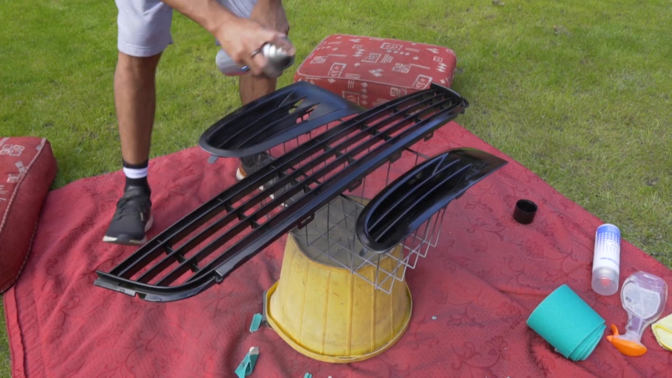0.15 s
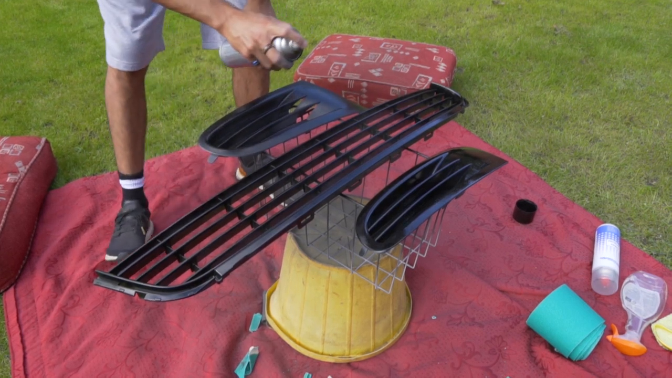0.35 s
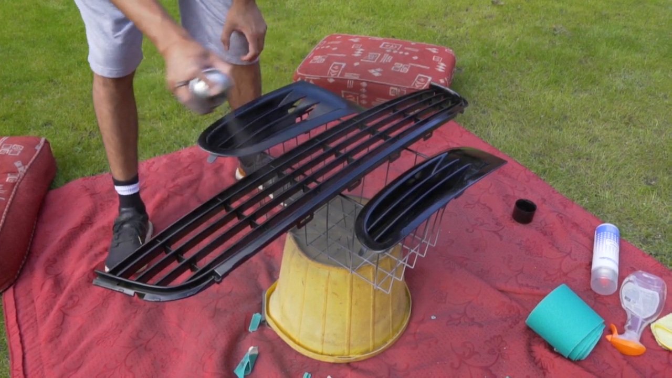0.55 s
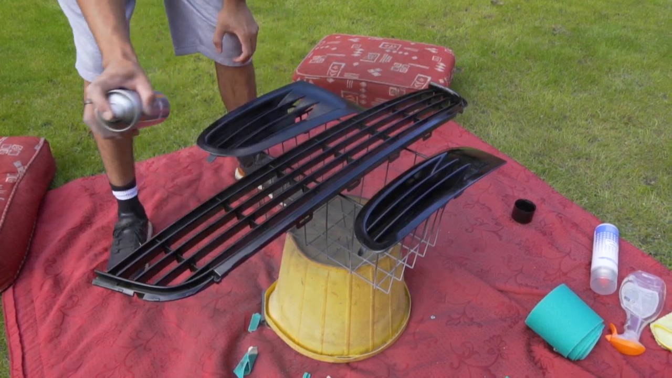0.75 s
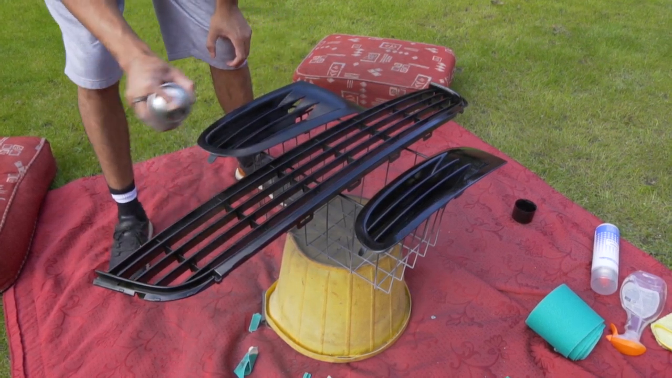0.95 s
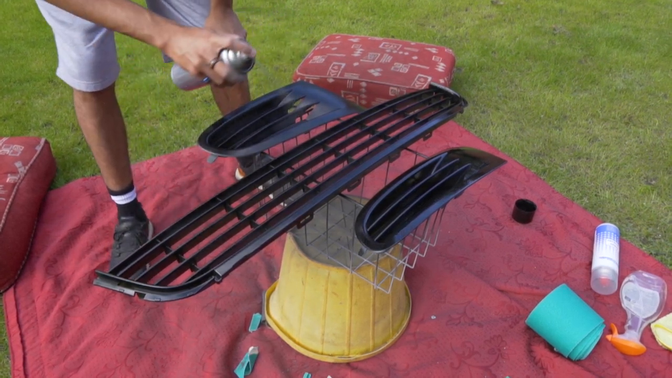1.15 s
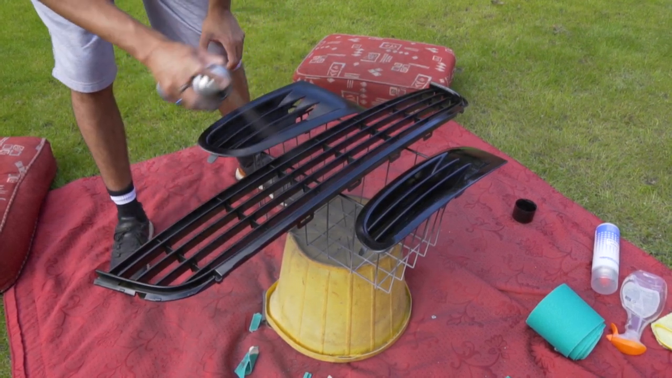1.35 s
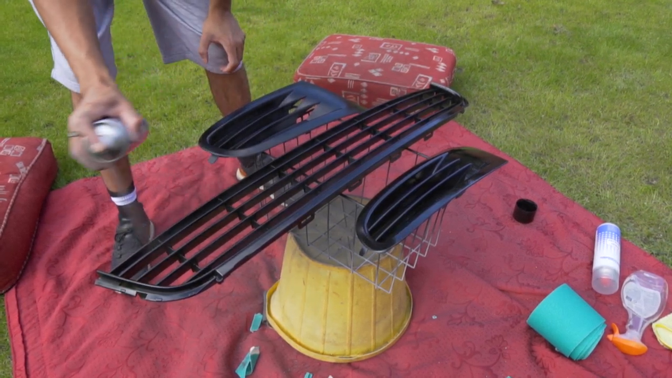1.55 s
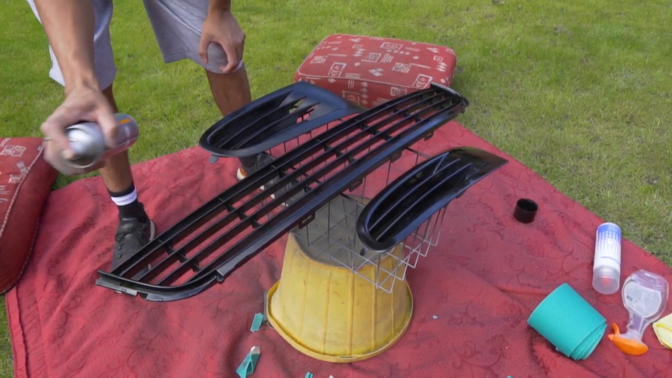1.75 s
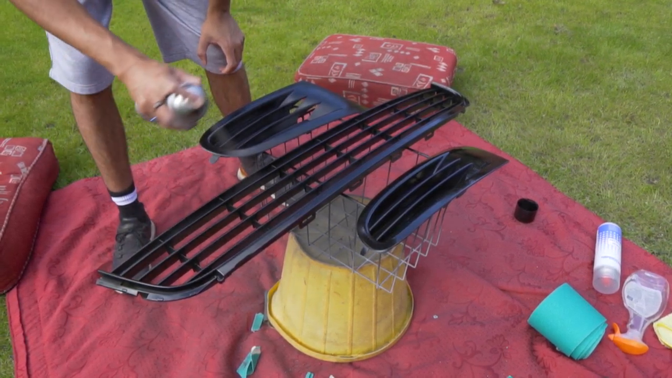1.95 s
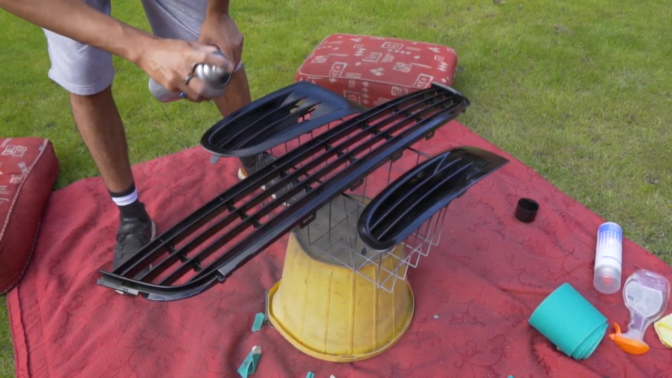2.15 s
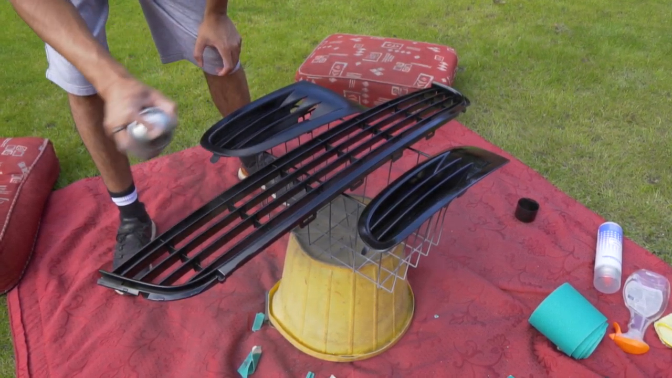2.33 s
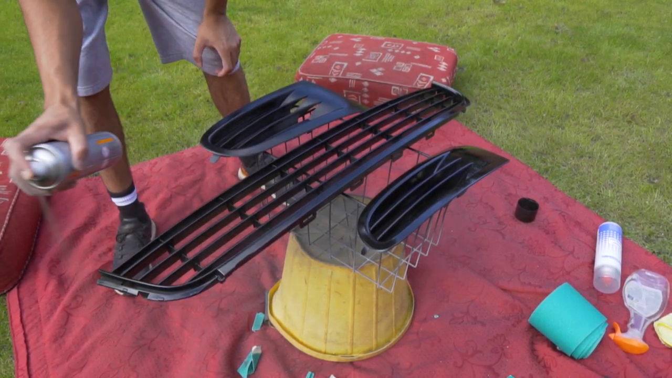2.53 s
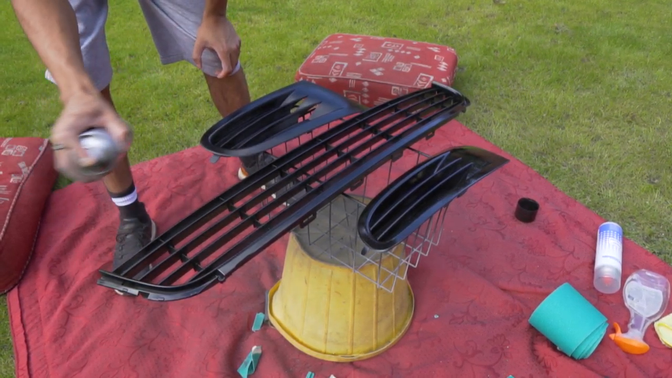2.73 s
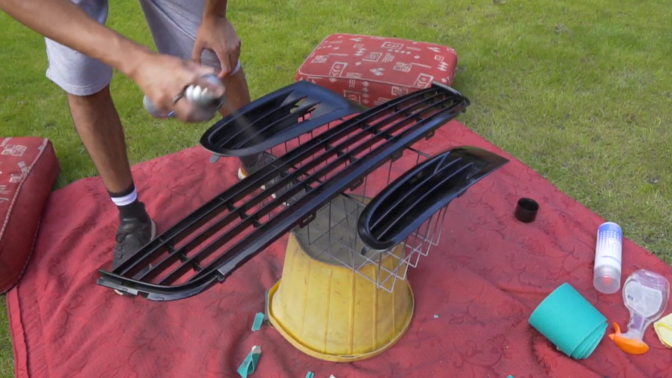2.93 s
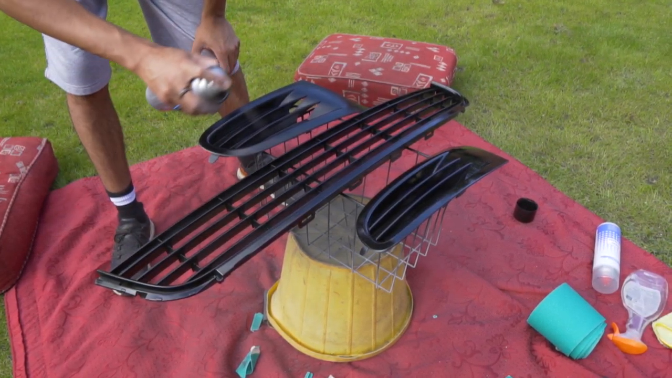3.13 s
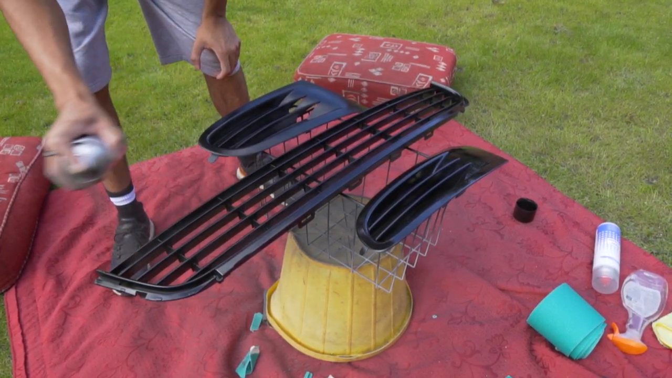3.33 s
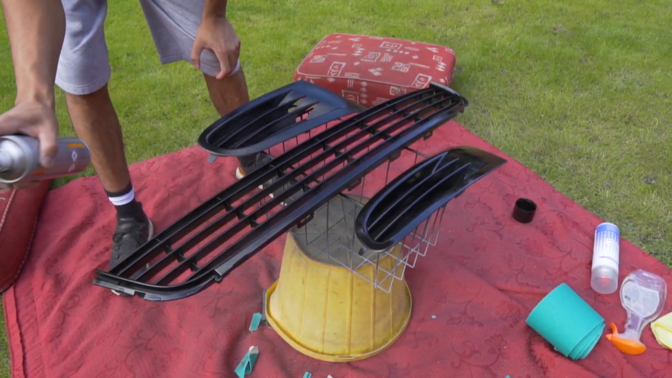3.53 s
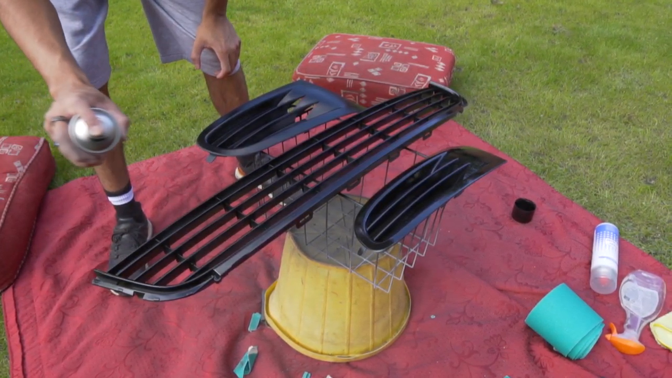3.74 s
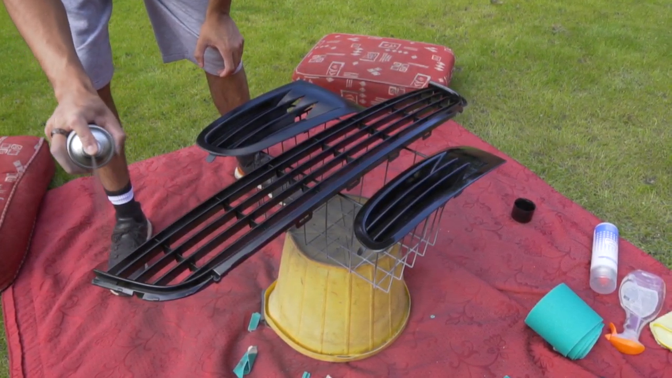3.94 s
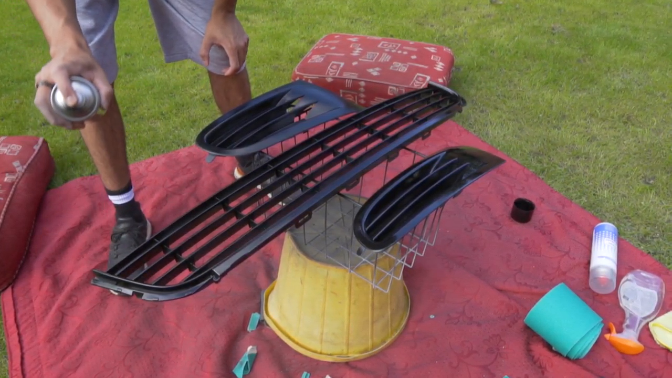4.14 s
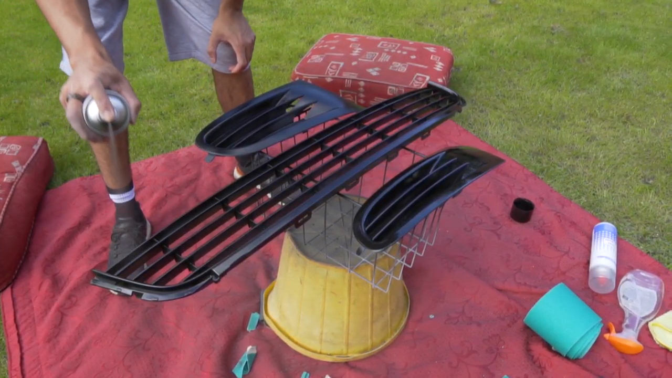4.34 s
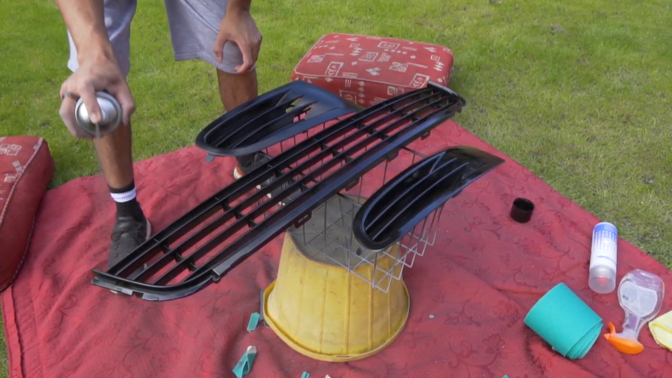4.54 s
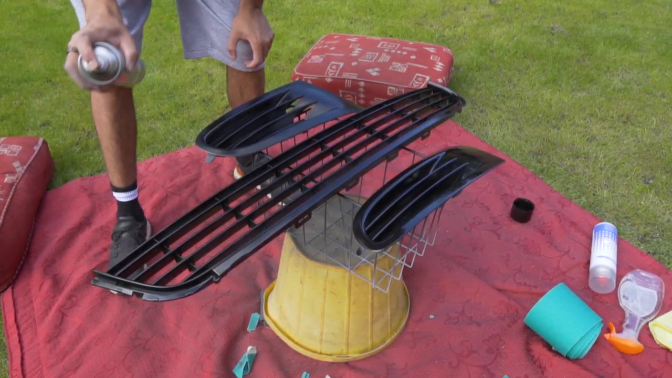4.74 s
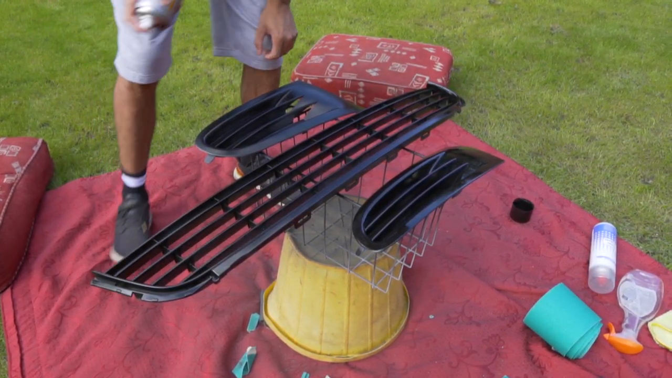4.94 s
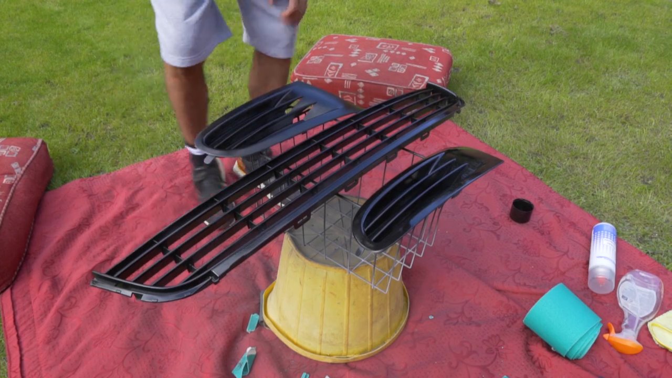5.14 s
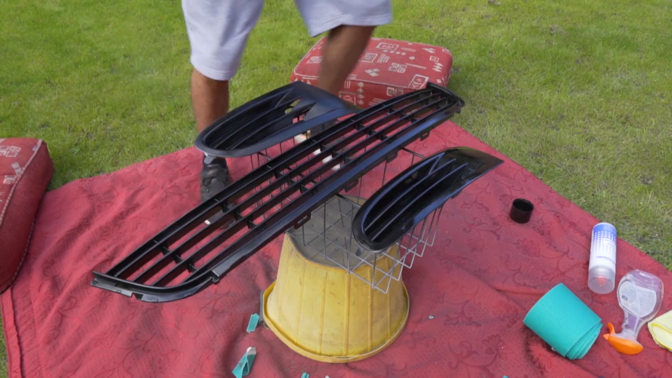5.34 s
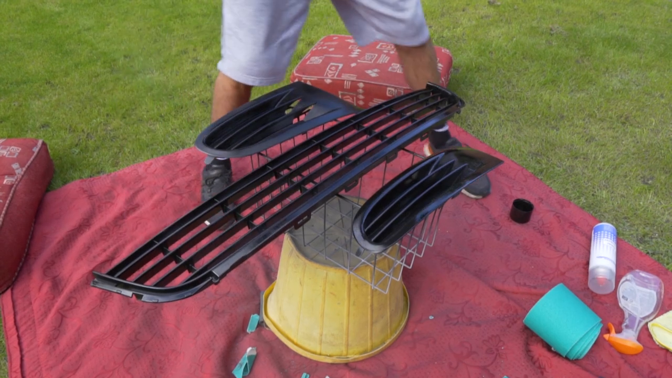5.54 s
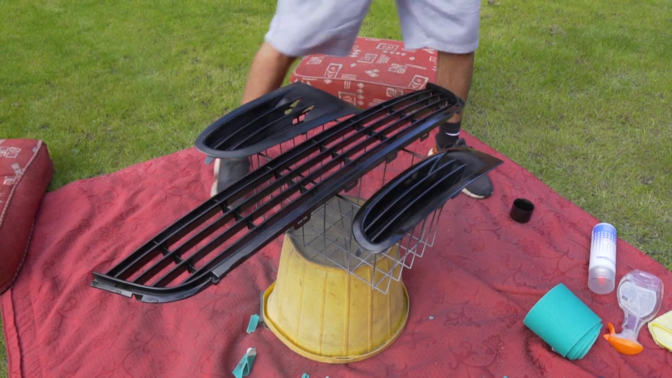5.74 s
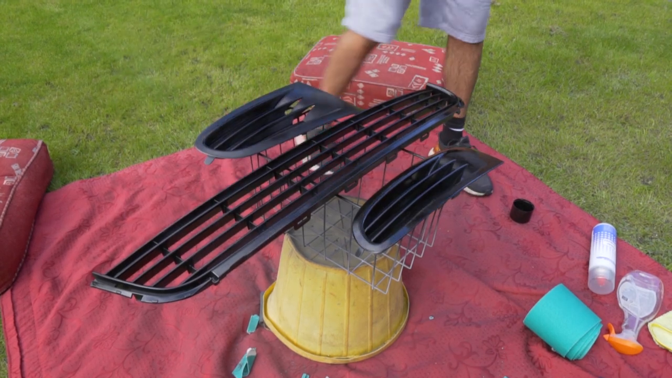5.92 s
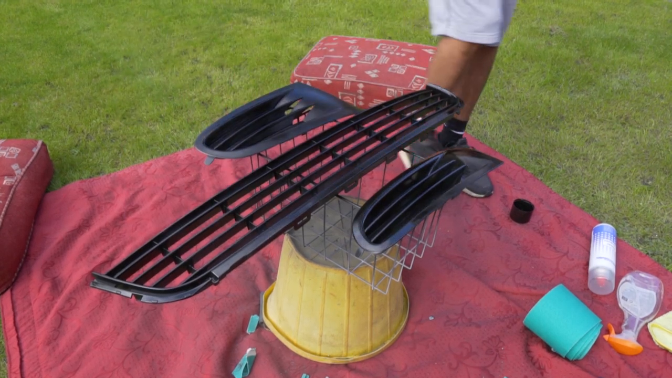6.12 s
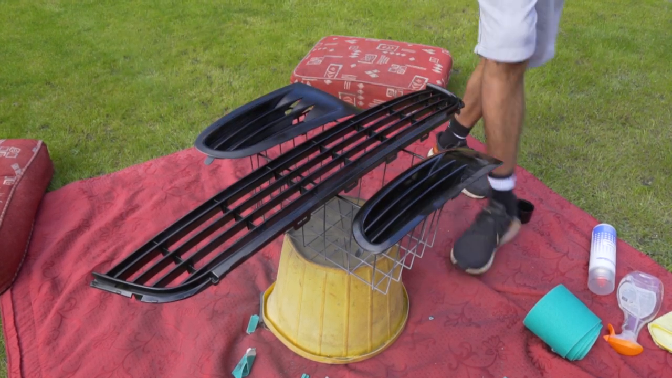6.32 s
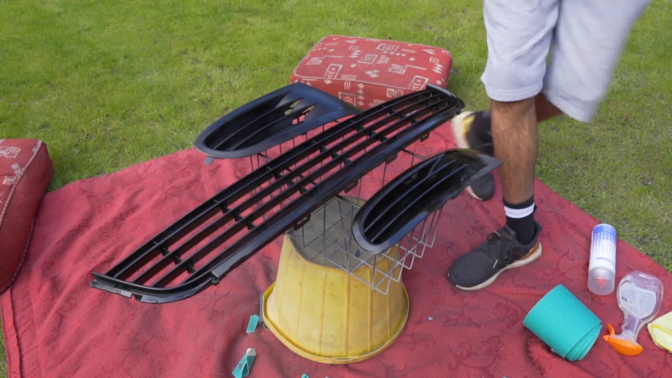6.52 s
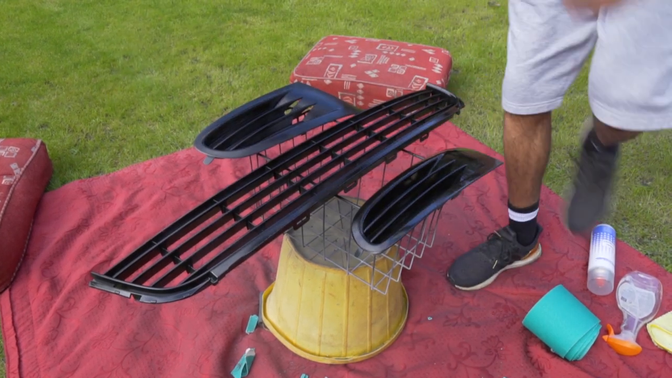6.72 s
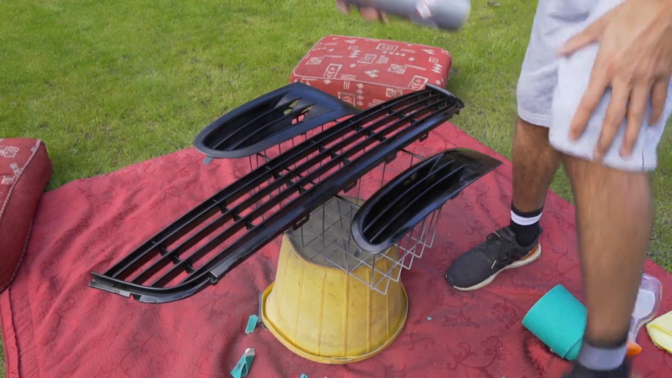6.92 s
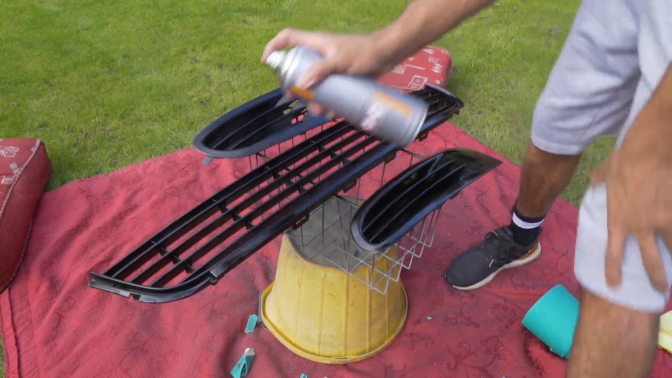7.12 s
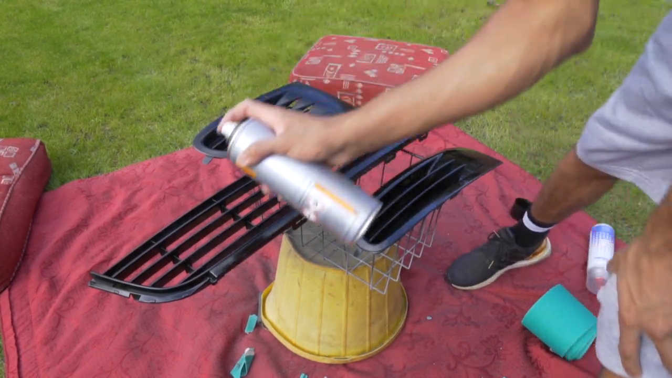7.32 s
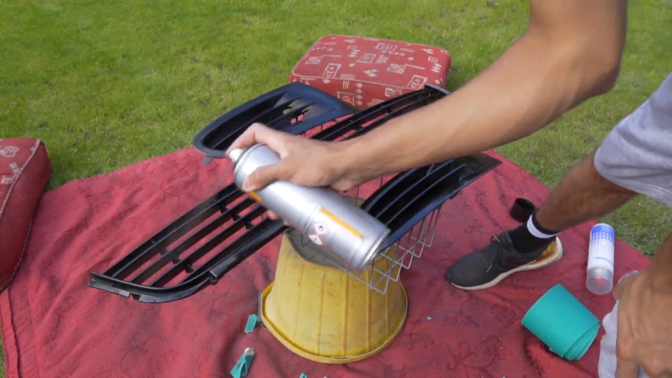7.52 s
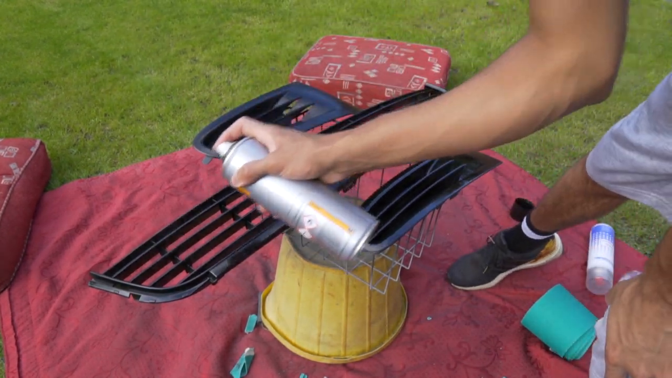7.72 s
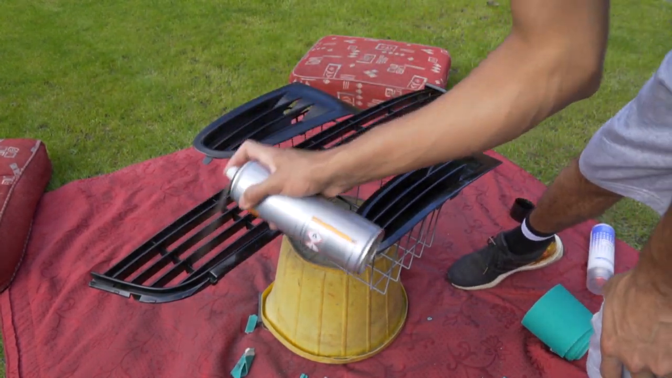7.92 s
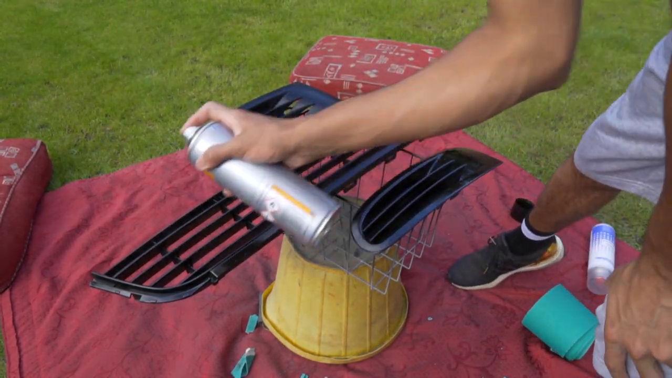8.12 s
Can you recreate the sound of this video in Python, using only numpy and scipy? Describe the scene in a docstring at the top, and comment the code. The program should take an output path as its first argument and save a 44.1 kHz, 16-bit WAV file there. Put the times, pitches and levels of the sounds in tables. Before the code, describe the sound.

Outdoors, with distant traffic humming softly, a close microphone picks up an aerosol can spraying in short rhythmic hisses, about two a second. After ten of them the can is shaken, its ball knocking with dry, irregular metallic clicks while the painter's clothing rustles softly. Near the end the hiss returns for two short bursts, with a few weaker clicks from the can.

```python
"""Far traffic and a low engine drone lie under a lawn, heard at one close microphone. From the start a
spray can paints plastic parts in ten short squirts, its turbulent jet swept to and fro so that the
reflections off the parts shift. Near 4 s a puff of wind rumbles. From about 5 s the painter steps round
in rustling clothes while the mixing ball strikes the can's base and wall into ringing.
At 7.4 s two more squirts begin, over the last few knocks."""
import sys
import numpy as np
from scipy import signal
from scipy.fft import rfft, irfft
from scipy.io import wavfile
from scipy.ndimage import uniform_filter1d, map_coordinates

SR = 44100
rng = np.random.default_rng(int(sys.argv[2]) if len(sys.argv) > 2 else 0)


def waveform_to_disk(signal):
    """Save audio, clipped to [-1, 1], as 16-bit WAV at the path in sys.argv[1]."""
    frames = np.transpose(np.atleast_2d(signal))
    scaled = np.clip(frames, -1, 1) * 32767
    samples = np.round(scaled).astype(np.int16)
    wavfile.write(sys.argv[1], SR, samples)


N = 360293
TIME = np.arange(N) / SR


def from_db(db):
    """Amplitude grows tenfold for every 20 dB."""
    return 10 ** (np.asarray(db) / 20)


def unit_rms(x):
    """Normalisation to a mean power of 1."""
    return x / np.sqrt(np.mean(x ** 2) + 1e-20)


def noise(spectrum):
    """Spectral shaping colours white noise by (Hz, dB) points; rms 1."""
    hz, db = np.transpose(spectrum)
    log_hz = np.log(np.fft.rfftfreq(N, 1 / SR) + 1)
    gain = from_db(np.interp(log_hz, np.log(hz), db, left=-np.inf))
    return unit_rms(irfft(rfft(rng.standard_normal(N)) * gain, N))


def drift(rate_hz):
    """Low-pass filtering turns noise into a slow random fluctuation; rms 1."""
    r = np.exp(-2 * np.pi * rate_hz / SR)
    return unit_rms(signal.lfilter([1], [1, -2 * r, r * r], rng.standard_normal(N + SR))[SR:])


def resonant_noise(centre_hz, width_hz, block=256):
    """A moving resonance, applied twice, selects one band of noise; rms 1."""
    out, state = rng.standard_normal(N), np.zeros((2, 2))
    r = np.exp(-np.pi * width_hz / SR)
    for i in range(0, N, block):
        section = [1, 0, -1, 1, -2 * r * np.cos(2 * np.pi * centre_hz[i] / SR), r * r]
        out[i:i + block], state = signal.sosfilt([section, section], out[i:i + block], zi=state)
    return unit_rms(out)


def swells(rows):
    """Gaussian envelopes add up to one gain curve."""
    return sum(from_db(db) * np.exp(-((TIME - s) / half_s) ** 2) for s, half_s, db in rows)


# Tyre roar. Each row: frequency in Hz, relative spectral density in dB.
TRAFFIC_SPECTRUM = [(18, 5.5), (32, 6), (48, 5), (100, -2), (190, -3), (255, -2.5), (350, -8), (660, -6.5),
                    (890, -1.5), (1130, -5), (1450, -12), (2100, -20.5), (3400, -31.5), (8000, -44.5),
                    (16000, -54)]
# Each row: loudest moment in seconds, half length in seconds, level in dB.
ENGINE_SWELLS = [(1.48, .12, -39.5), (2.14, .08, -40.5), (2.4, .14, -38.7), (3.2, .15, -50),
                 (4.1, 0.47, -52), (5.0, 0.28, -52), (7.2, 0.24, -51)]
# Each row: time in seconds, pitch in Hz.
ENGINE_PITCH = [(0, 77), (1.3, 80.4), (2.4, 80), (3.3, 81), (4.6, 71), (5.6, 65), (8.17, 64)]

def street():
    """Far tyres give broadband noise; an engine gives a tone whose pitch falls as it slows."""
    hz = np.interp(TIME, *np.transpose(ENGINE_PITCH))
    phase = 2 * np.pi * np.cumsum(hz * (1 + 0.0058 * drift(3.7))) / SR
    engine_rms = (from_db(-55) + swells(ENGINE_SWELLS)) * from_db(1.7 * drift(8.6))
    tyres = from_db(-38 + 0.12 * drift(1.6)) * noise(TRAFFIC_SPECTRUM)
    return np.sqrt(2) * engine_rms * np.sin(phase) + tyres


def breeze():
    """Pressure fluctuations in a puff of wind rumble on the microphone."""
    return swells([(3.95, .5, -44)]) * noise([(20, 1), (45, 0), (90, -11), (200, -26), (1000, -73)])


def garden_echoes(x, early_db, early_t60, late_db, late_t60):
    """Scattering off near things and a faint tail from fences and walls return a duller sound."""
    t = np.arange(SR // 2) / SR
    near, far = rng.standard_normal((2, len(t))) * (t > .003)
    near = near * rng.exponential(1, len(t)) * from_db(-60 * t / early_t60)
    far = far * from_db(-60 * t / late_t60)
    response = from_db(early_db) * near / np.linalg.norm(near)
    response += from_db(late_db) * far / np.linalg.norm(far)
    response = signal.sosfilt(signal.butter(2, 9500, fs=SR, output="sos"), response)
    return signal.fftconvolve(x, response)[:N]


# Each row: frequency in Hz, relative spectral density in dB.
CLOTH_SPECTRUM = [(900, -12), (1800, 0), (3000, -1.2), (4800, 0), (6500, -7), (9000, -9), (10500, -18),
                  (13000, -16), (16000, -20)]
# Rubbing at each step. Each row: middle in seconds, half length in seconds, level in dB.
STEP_RUBS = [(4.95, 0.069, -56.5), (5.12, 0.14, -53.5), (5.26, 0.086, -53.5), (5.51, .03, -53),
             (5.75, 0.21, -58), (6.08, 0.061, -52.5), (6.66, 0.084, -54.5), (7.05, .2, -57),
             (7.39, .06, -61.5)]

def clothes():
    """Friction of cloth and soles makes uneven noise; one rub has a narrow, zipping note."""
    zipping = swells([(5.26, 0.031, -51)]) * resonant_noise(np.full(N, 4800), width_hz=700)
    return swells(STEP_RUBS) * from_db(2.3 * drift(40)) * noise(CLOTH_SPECTRUM) + zipping


def struck(modes, t, scatter, spread_db, crack):
    """An impact excites damped modes and a noisy crack, with the energy of 10 ms at rms 1."""
    hz, db, t60 = np.transpose(modes)[:, :, None]
    # where the ball lands shifts and weights each mode, here by chance
    detune, weight, side = rng.standard_normal((3, len(modes), 1))
    envelopes = np.sign(side) * from_db(db + spread_db * weight - 60 * t / t60)
    rings = envelopes * np.sin(2 * np.pi * hz * (1 + scatter * detune) * t)
    # the crack spans the modes and falls away on either side
    octaves = np.log2(np.fft.rfftfreq(len(t), 1 / SR) + 1)
    order = np.argsort(hz[:, 0])
    centres = np.log2(hz[order, 0])
    octaves_outside = np.abs(octaves - np.clip(octaves, centres[0], centres[-1]))
    colour = from_db(np.interp(octaves, centres, db[order, 0]) - 9.2 * octaves_outside)
    burst = irfft(rfft(rng.standard_normal(len(t))) * colour, len(t))
    burst *= from_db(-60 * t / (0.49 * t60.mean()))
    attack = 1 - np.exp(-t / 0.00013)
    blow = (unit_rms(rings.sum(axis=0)) + crack * unit_rms(burst)) * attack
    return blow / np.sqrt(np.sum(blow ** 2) / (.01 * SR))


# Steel wall modes. Each row: frequency in Hz, relative level in dB, 60 dB decay time in seconds.
WALL_LOW_MODES = [(940, -9, 0.0092), (2384, -1, 0.02), (2740, 0.5, 0.015), (3160, 0.5, 0.014),
                  (3360, -4.5, 0.021), (3810, 1.5, 0.016), (4180, -3, 0.021), (4460, -2.5, 0.012)]
WALL_HIGH_MODES = [(5240, -0.5, 0.014), (5950, -2, 0.012), (6360, 0, 0.019), (7060, 0, 0.014),
                   (7590, -5, 0.014), (8360, -2.5, 0.013), (8890, -3.5, 0.015), (10900, -15, 0.0052),
                   (11140, -17.5, .009), (12150, -20, 0.0076), (14500, -16, 0.0048)]

def wall_hit(clank_db, tick_db, t):
    """Damping cuts the thin wall's modes short: a dry clank and a brighter tick."""
    blow = dict(scatter=.07, spread_db=2.4, crack=1.2)
    clank = from_db(clank_db + 0.63) * struck(WALL_LOW_MODES, t, **blow)
    tick = from_db(tick_db - 1.7) * struck(WALL_HIGH_MODES, t, **blow)
    return clank + tick


# Each row: time in seconds, pitch of the base in Hz, relative level in dB,
# place from 0 (base) to 1 (rim), gap to the first bounce in seconds (0 for none).
BALL_KNOCKS = [(2.676, 1700, -39.5, .55, 0), (2.697, 1720, -49, 0.67, 0.019),
               (5.1123, 1700, -30, 0.14, 0.028), (5.38, 1940, -28, 0.62, 0.00021),
               (5.4282, 1660, -38.5, 0.26, 0.00099), (5.4512, 1670, -36.5, 0.24, 0.017),
               (5.482, 1710, -39, 0.2, 0.013), (5.582, 1545, -14.5, 0.7, 0), (5.607, 2000, -25, .45, 0),
               (5.611, 1720, -21, 0, 0), (5.6369, 1700, -27.5, 0.33, 0.022),
               (5.7966, 2125, -18, 0.68, 0.0032), (5.853, 1310, -30, 0.51, 0),
               (5.88, 1770, -34, 0.15, .023), (5.9443, 1800, -16.5, 0.94, 0),
               (5.9454, 1750, -11.5, .75, 0.00013), (5.974, 1840, -30.5, 0.79, 0.0036),
               (6.0523, 1671, -31, .24, 0.00061), (6.0849, 1700, -30.5, 0.11, 0.017),
               (6.1672, 1390, -23, 0.53, 0.0022), (6.2577, 1760, -28, 0.14, .0485),
               (6.373, 1739, -12, 1, 0.0011), (6.4334, 1880, -24, 0.17, 0), (6.517, 1610, -30, 0.25, 0.045),
               (6.7545, 1830, -18, 0.59, 0), (6.8155, 1464, -20.5, 0.12, 0.00012),
               (6.904, 1329, -11, 0.83, 0), (6.9272, 1690, -15, .68, 0.00038),
               (7.0247, 1590, -17.5, 0.11, 0), (7.0987, 1629, -19.5, 0.59, 0.00071),
               (7.104, 1630, -21, .12, 0), (7.1828, 1650, -20.5, 0.04, 0), (7.2374, 1610, -21, 0, 0),
               (7.2697, 1647, -31.5, 0.075, 0.016), (7.5596, 2070, -24, 0.48, 0),
               (7.641, 1600, -34.5, .45, .016), (7.7066, 1460, -33.5, 0.53, 0.02),
               (7.7756, 1490, -38, 0.43, .021), (8.0609, 1430, -26.5, 0.44, 0),
               (8.1275, 1513, -30, 0.31, 0)]

def contacts(bounces=4, restitution=.72, loss_db=5.5):
    """Inelastic collision: after a knock, each bounce comes sooner and weaker than the last."""
    for s, hz, db, place, gap_s in BALL_KNOCKS:
        yield s, hz, db, place
        for bounce in range(bounces if gap_s > 0 else 0):
            s += gap_s * restitution ** bounce
            yield s, hz, db - loss_db * (bounce + 1), place


# Each row: place from 0 (base) to 1 (rim), then gains of base ring, wall clank and tick in dB.
GAINS_BY_PLACE = [(0, -0.5, -12.5, -18), (.2, -.5, -6, -6.5), (.45, -6.5, 0.5, -7), (.75, -14.5, -8.5, 1),
                  (1, -42, -20, -1.5)]

def mixing_ball(size=2048):
    """The point of impact sets how strongly the paint-damped base and the steel wall ring."""
    base, wall = np.zeros((2, N + size))
    t = np.arange(size) / SR
    places, *gains_db = np.transpose(GAINS_BY_PLACE)
    for s, hz, db, place in contacts():
        i = round(s * SR)
        base_db, clank_db, tick_db = (db + np.interp(place, places, gain) for gain in gains_db)
        base_modes = [(hz * 0.65, -21, .007), (hz * 0.737, -10.5, .009), (hz, 0, .017),
                      (hz * 1.102, -11, .02), (1790, -24, .09)]
        base[i:i + size] += from_db(base_db) * struck(base_modes, t, scatter=.01, spread_db=2.5, crack=.45)
        wall[i:i + size] += wall_hit(clank_db, tick_db, t)
    # the knocks carry nothing below about 600 Hz
    low_cut = signal.butter(3, 620, "high", fs=SR, output="sos")
    return signal.sosfilt(low_cut, np.array([base[:N], wall[:N]]) + 1e-18)


def dome_ring(wall, coupling_db, hz, t60):
    """Sympathetic resonance: knocks on the wall leave the can's dome ringing faintly."""
    r, w = from_db(-60 / (t60 * SR)), 2 * np.pi * hz / SR
    ring = signal.lfilter([0, np.sin(w)], [1, -2 * r * np.cos(w), r * r], wall + 1e-18)
    return from_db(coupling_db) * ring


# Paint inside the can. Each row: frequency in Hz, relative spectral density in dB.
SLOSH_SPECTRUM = [(1200, -5), (2500, -15), (4500, 2), (7000, 0.5), (9000, -7), (12000, -13), (16000, -23)]

def slosh(wall, gain_db, t60):
    """The energy of hard knocks flings paint about, and its spatter decays exponentially."""
    r = from_db(-120 / (t60 * SR))
    stirred = np.sqrt(signal.lfilter([1 - r], [1, -r], wall ** 2 + 1e-18))
    return from_db(gain_db + 2.3 * drift(150)) * stirred * noise(SLOSH_SPECTRUM)


# One squirt per arm stroke. Each row: opening, shutting and press time in seconds; relative level at
# start and end in dB; moment of facing the listener and time to turn away in seconds; main resonance
# and sizzle in Hz; relative hollow note level in dB; reflection lag at start, middle and end in ms.
SPRAY_STROKES = [(-.05, 0.308, .004, -27, -32, 0.091, 0.094, 7730, 12300, -40, 0.85, 0.55, .44),
                 (.439, 0.787, .02, -29.5, -28, .66, .11, 7730, 12400, -39, 0.5, 0.62, .88),
                 (.906, 1.265, .01, -27.5, -29, 1.07, 0.081, 7700, 12300, -33, 0.7, 0.67, .53),
                 (1.36, 1.692, .0085, -31, -26.5, 1.48, 0.14, 7900, 12500, -35, 0.54, .72, 0.85),
                 (1.816, 2.143, 0.02, -27.5, -29, 1.98, 0.088, 7640, 12500, -37, .73, 0.64, 0.72),
                 (2.277, 2.639, 0.039, -28.5, -27.5, 2.375, 0.11, 8000, 12600, -35, 0.65, 0.65, .69),
                 (2.752, 3.093, .0076, -28.5, -28, 2.925, 0.11, 7970, 12600, -35, 0.7, 0.64, 0.6),
                 (3.205, 3.522, 0.01, -28.5, -28, 3.32, 0.1, 7870, 12700, -35, .68, 0.65, 0.71),
                 (3.878, 4.152, 0.011, -28.5, -28, 3.995, .2, 7600, 12200, -22, .87, .66, .78),
                 (4.372, 4.677, 0.014, -27.5, -29, 4.48, 0.32, 7500, 12200, -19, 0.77, 0.6, 0.89),
                 (7.44, 7.713, 0.0095, -30.5, -29.5, 7.56, .19, 8400, 11820, -35, .35, 0.61, 0.7),
                 (7.82, 8.069, 0.0046, -29.5, -31, 7.942, .2, 8200, 12110, -37, 0.56, 0.41, 0.29)]

def arm_sweep(away_rise_hz=1080):
    """Source motion: the can faces the listener once a stroke; turned away, its resonance rises."""
    curves = np.zeros((6, N))
    for opens, shuts, _, start_db, end_db, facing_s, turn_s, *tone in SPRAY_STROKES:
        hz, sizzle_hz, hollow_db, *lags_ms = tone
        now = TIME > opens - .04
        along = np.clip((TIME[now] - opens) / (shuts - opens), 0, 1)
        level_db = start_db + (end_db - start_db) * along
        away = 1 - np.exp(-((TIME[now] - facing_s) / turn_s) ** 2)
        centre_hz = hz + away_rise_hz * away
        lag_ms = np.polyval(np.polyfit([0, .5, 1], lags_ms, 2), along)
        curves[:, now] = np.broadcast_arrays(level_db, away, centre_hz, sizzle_hz, hollow_db, lag_ms)
    return curves


# The nozzle spits as the finger takes up the button. Each entry: start in seconds.
SPIT_TIMES = [3.861, 4.3505]

def valve(close_s, bleed_db, bleed_s, spit_s=.004, spit_db=-22):
    """Throttling: flow swells with the press and narrows before shutting; the nozzle then bleeds empty."""
    flow = np.zeros(N)
    for opens, shuts, press_s, *_ in SPRAY_STROKES:
        on = (TIME > opens) & (TIME < shuts)
        opening = 1 - np.exp((opens - TIME[on]) / press_s)
        closing = 1 - np.exp((TIME[on] - shuts) / close_s)
        flow[on] = opening * closing
    for s in SPIT_TIMES:
        flow[(TIME > s) & (TIME < s + spit_s)] = from_db(spit_db)
    r = np.exp(-1 / (bleed_s * SR))
    return flow + from_db(bleed_db) * signal.lfilter([1 - r], [1, -r], flow + 1e-18)


def delayed(x, ms):
    """Propagation over a changing path delays a sound by a moving lag."""
    return map_coordinates(x, [np.arange(N) - ms * SR / 1000], order=3)


# Parts at different distances. Each row: multiple of the lag, gain in dB.
PART_ECHOES = [(1, -9.2), (1.2, -18.5), (1.5, -17)]

def with_reflections(jet, lag_ms):
    """Comb filtering: treble off the small parts and all bands off the ground interfere with the jet."""
    lag_ms = lag_ms + .016 * drift(10)
    treble = signal.sosfilt(signal.butter(1, 5500, "high", fs=SR, output="sos"), jet)
    parts = sum(from_db(db) * delayed(treble, path * lag_ms) for path, db in PART_ECHOES)
    ground = .15 * delayed(jet, lag_ms + 2.25)
    return jet + parts + ground


# The jet's broad rush. Each row: frequency in Hz, relative spectral density in dB.
JET_SPECTRUM = [(700, -17), (1500, -3), (2400, -0.5), (3200, -3), (4500, 0), (6400, 2), (9000, -3.5),
                (10500, -11), (13500, 2), (16000, -2)]

def spray(away_loss_db=9.5):
    """Turbulence gives a broad rush and drives nozzle resonances, fluttering as the paint breaks up."""
    level_db, away, centre_hz, sizzle_hz, hollow_db, lag_ms = arm_sweep()
    flow = valve(close_s=0.022, bleed_db=-20.5, bleed_s=0.024)
    rush = from_db(-2.5 - 0.42 * away) * noise(JET_SPECTRUM)
    body_gain = from_db(-3.5 + .8 * away + 0.71 * drift(16))
    body = body_gain * resonant_noise(centre_hz + 130 * drift(11.4), width_hz=2400)
    sizzle_gain = from_db(-1.7 - away_loss_db * away + 0.57 * drift(13))
    sizzle = sizzle_gain * resonant_noise(sizzle_hz + 200 * drift(8.9), width_hz=3100)
    # a hollow note comes through while the valve is only partly open
    throttled = np.sqrt(np.clip(1 - uniform_filter1d(flow, size=4000), 0, 1))
    hollow_gain = from_db(hollow_db) + from_db(-11.5) * throttled
    hollow = hollow_gain * resonant_noise(2450 + 60 * drift(10), width_hz=350)
    jet = (rush + body + sizzle + hollow) * from_db(level_db - 1.47 + .5 * drift(60)) * flow
    return with_reflections(jet, lag_ms)


def scene():
    """Superposition of can, echoes, painter and background, alike in both channels."""
    base, wall = mixing_ball()
    hiss = spray()
    dome = dome_ring(wall, coupling_db=-50.5, hz=1780, t60=0.18)
    can = hiss + base + wall + dome + slosh(wall, gain_db=-19.5, t60=0.22)
    echoes = garden_echoes(wall + .5 * base + 0.95 * hiss,
                           early_db=-18, early_t60=0.043, late_db=-21.5, late_t60=0.3)
    return np.tile(can + echoes + clothes() + street() + breeze(), (2, 1))


def record(dry):
    """Overload clips the hardest knocks; a steep low-pass stops everything above 16.5 kHz."""
    return signal.sosfilt(signal.cheby2(16, 60, 16500, fs=SR, output="sos"), np.clip(dry, -1, 1))


dry = scene()
out = record(dry)
waveform_to_disk(out)
```